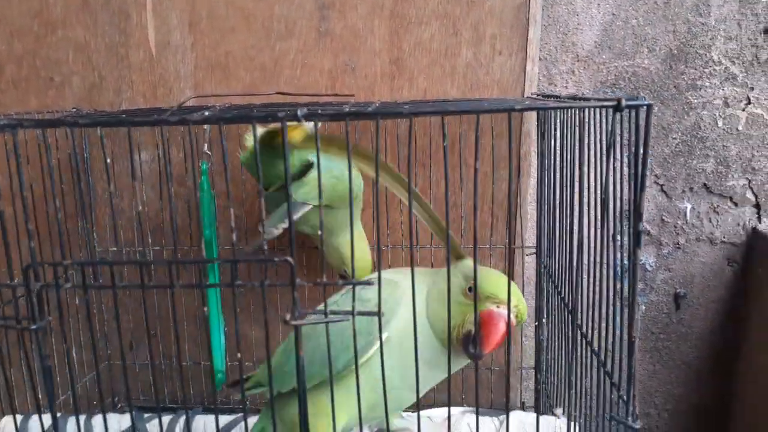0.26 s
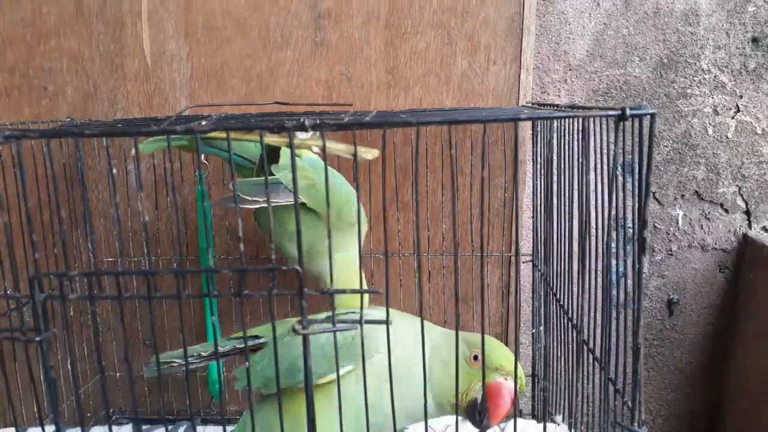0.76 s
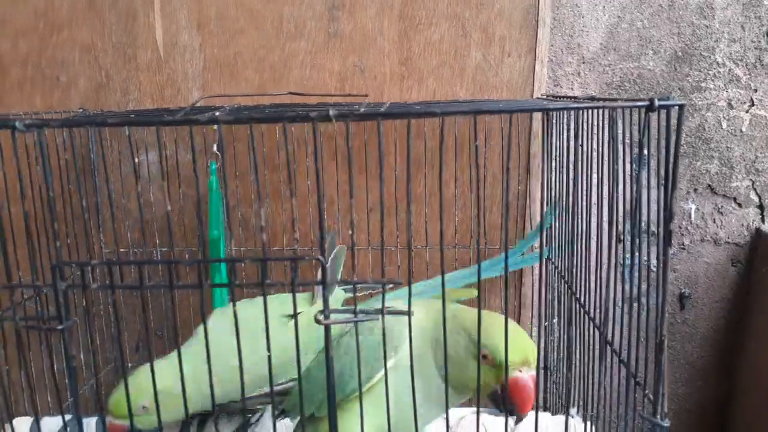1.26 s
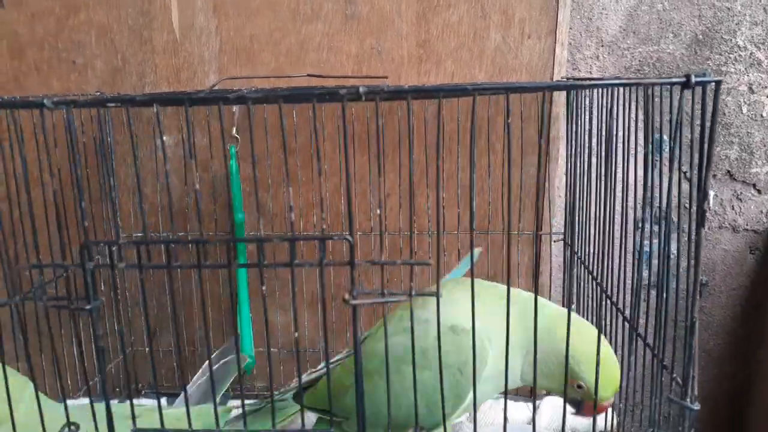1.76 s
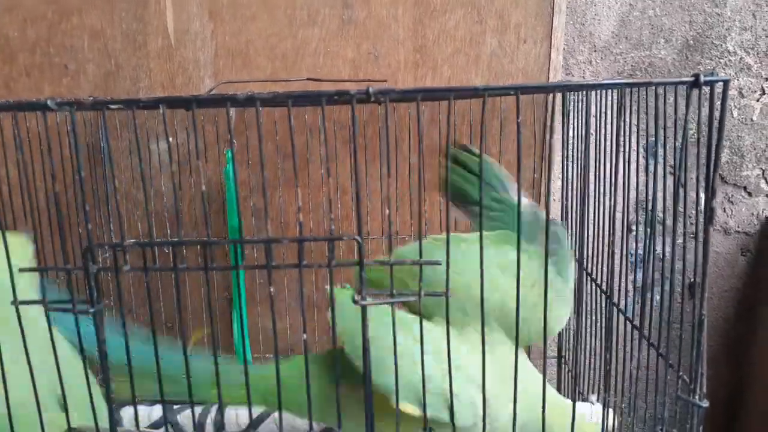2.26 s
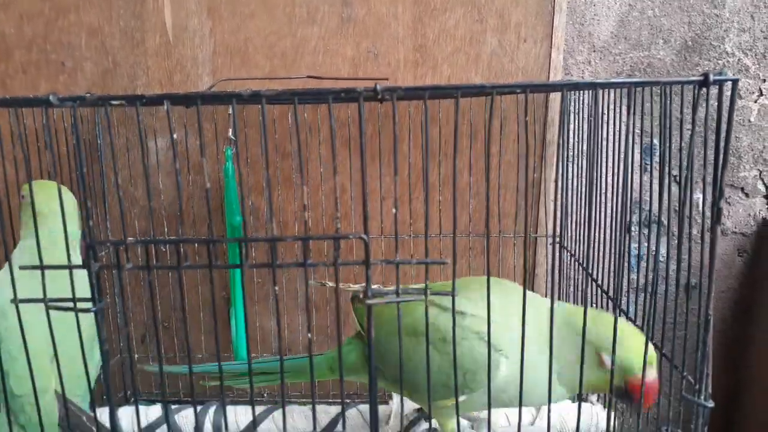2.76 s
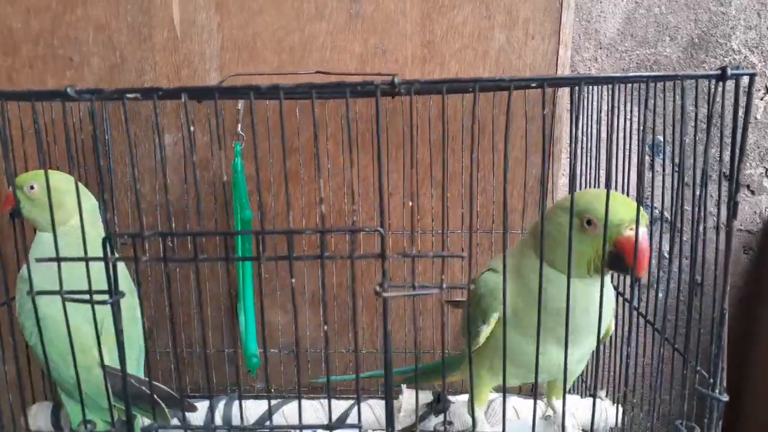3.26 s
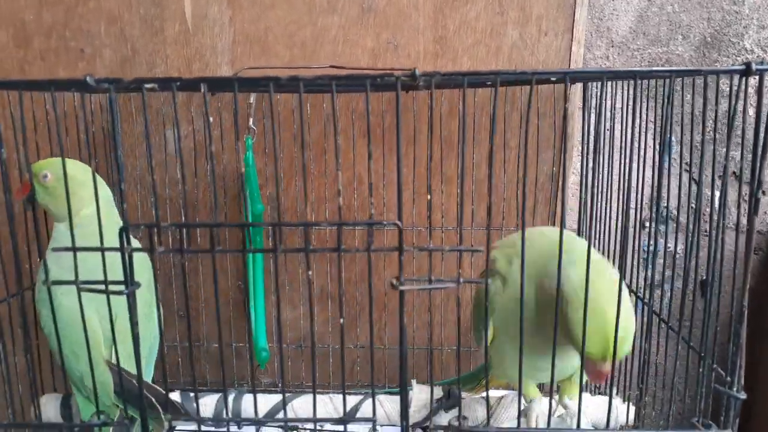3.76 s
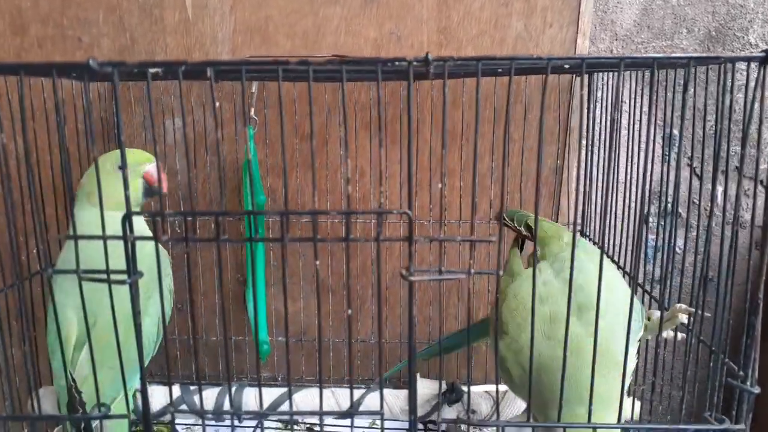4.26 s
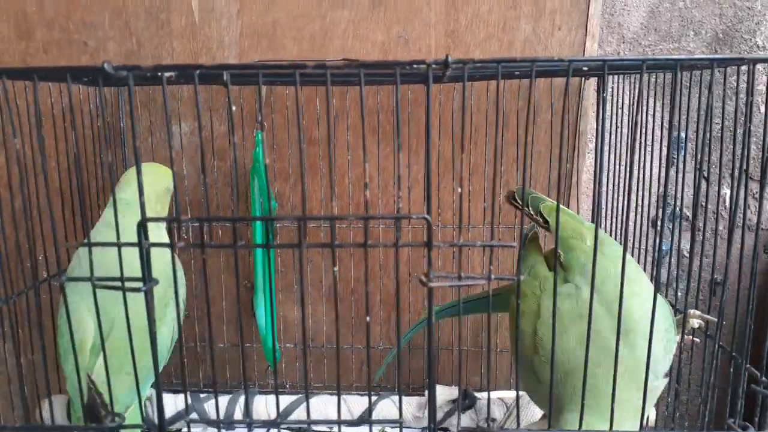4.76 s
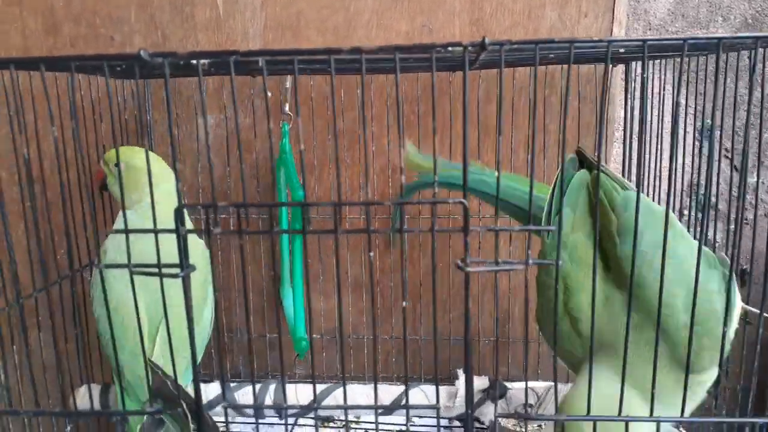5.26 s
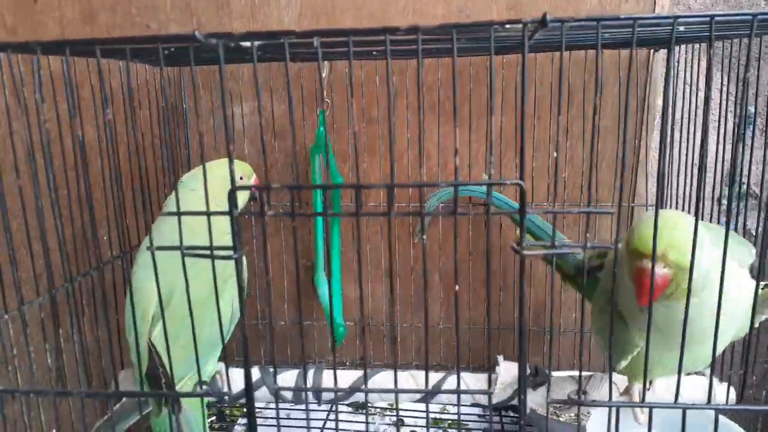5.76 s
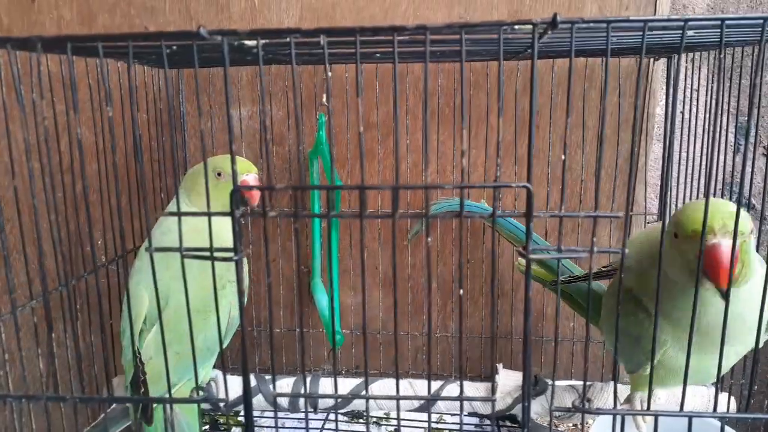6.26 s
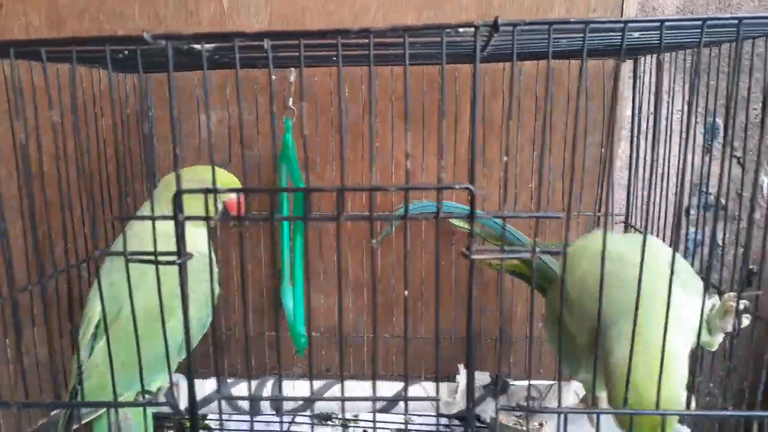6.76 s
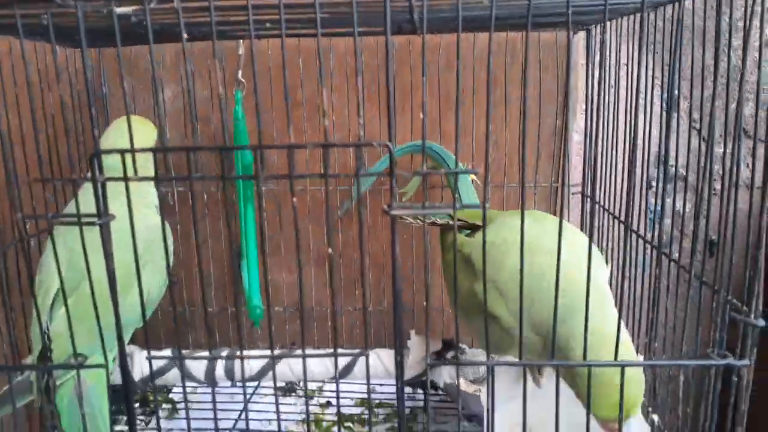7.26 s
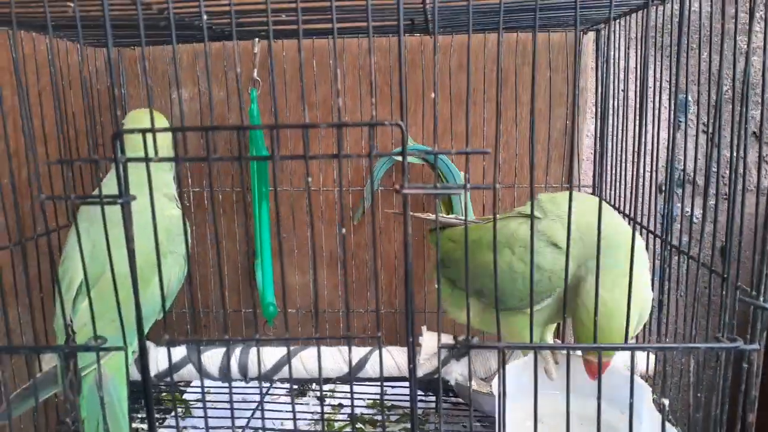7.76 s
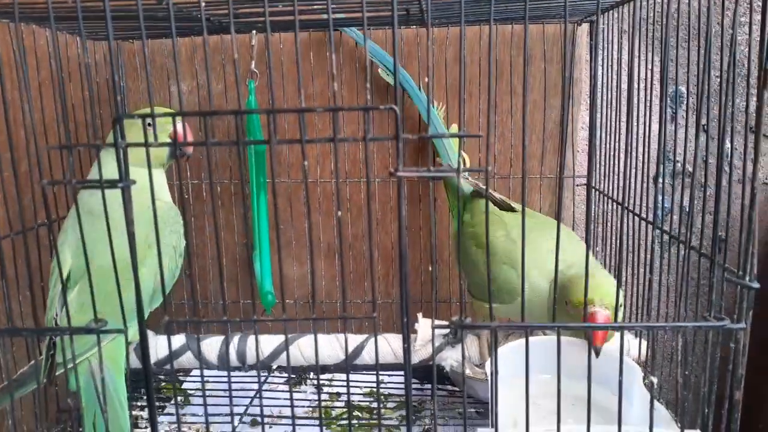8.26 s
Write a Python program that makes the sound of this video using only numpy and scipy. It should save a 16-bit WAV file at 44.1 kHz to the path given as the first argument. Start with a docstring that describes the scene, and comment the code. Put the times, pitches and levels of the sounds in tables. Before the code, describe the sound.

Sharp scratchy parrot squawks arch up and fall to a whistle, with beak and claw clicks, a small landing knock and soft feather rustles between.

```python
"""A wire cage against a wall, with two parakeets in it, close to a phone with two microphone ports.
A squawk sounds four times, the first already under way: stacked harmonics scratch upward, arch, then
fall to a whistle, shaped by the throat and by close echoes. Noise bursts make beak and claw ticks, knocks,
feather rustles and scuffs, with a short live room tail over outdoor rumble and hiss.
The phone's gain control turns everything down while it is loud, holds, then creeps back."""
import sys
import numpy as np
from scipy import signal
from scipy.fft import rfft, irfft, next_fast_len
from scipy.io import wavfile
from scipy.ndimage import uniform_filter1d, minimum_filter1d

SR = 44100
rng = np.random.default_rng(int(sys.argv[2]) if len(sys.argv) > 2 else 0)


def to_wav(sig):
    """Store sig (one row per channel, or 1-D mono) as 16-bit WAV at the path in sys.argv[1].

    Samples outside -1..1 are clipped; the rate is SR.
    """
    pcm = np.clip(np.atleast_2d(sig), -1, 1) * 32767
    pcm = np.round(pcm).astype(np.int16)
    wavfile.write(sys.argv[1], SR, pcm.T)  # frames by channels


N = 375291
TOP_HZ = 15900  # no voice harmonics above this; the phone also cuts here

# release of a voice: level slope, and a small lift in pitch
RELEASE_DB_PER_S, RELEASE_HZ_PER_S = -1100, 1500
SPLIT_FADE_DB_PER_S = -130

# the squawks, one row each: (start t/s,
#  pitch: (scratch t/s, climb t/s, slide t/s, crest f/Hz, low f/Hz the slide heads for,
#          climb bend, time to fall halfway t/s, fall steepness),
#  effort: (attack t/s, scratch level/dB, arch level/dB, whistle level/dB, added scratch roughness 0-1),
#  rattle: (time after the start t/s, half length t/s, added roughness 0-1))
SQUAWK_GESTURES = [ (-.12, (.035, .064, .134, 2150, 1335, 1, .042, 3), (0.012, 5.6, 5.7, 3.7, 0.36),
                   (0.15, 0.03, 0.2)), (4.681, (.034, .063, .16, 2172, 1392, 1.1, .069, 3.8),
                   (.004, 6.2, 13, 5.3, 0.41), (0.093, 0.021, 0.12)),
                   (5.258, (.038, .056, .148, 2142, 1413, 1.1, .0365, 2.9), (0.025, 12.2, 12.7, 4.6, 0.57),
                   (0.11, 0.041, .15)), (6.4385, (.023, .0635, .262, 2480, 1150, 4, .076, 1.62),
                   (0.011, 10, 12.3, 10, 0.5), (0.096, 0.025, 0.82))]
# where each squawk comes from: (right port lag t/ms, left minus right level/dB before the right direct loss,
#  brightness of the harmonics dB/octave)
CALLER_PLACES = [(0.299, 9.5, -2.5), (.387, 5, -3), (.387, 5, -3), (0.386, 4.5, -4)]
# a second tone as the voice splits: (squawk index, t/s, length t/s, pitch f/Hz, starting effort level/dB,
#  roughness 0-1)
SPLIT_VOICES = [(0, .016, .05, 3750, 9, .35), (3, 6.511, .05, 2765, 3, .15)]


def caller():
    """Four squawks; in the first and the last the voice briefly splits in two."""
    out = np.zeros((2, N))
    t = np.arange(SR // 2) / SR
    for (start, pitch, effort, rattle), (lag_ms, pan_db, slope_db) in zip(SQUAWK_GESTURES, CALLER_PLACES):
        hz, effort_db, rough = gesture(t, pitch, effort, rattle)
        voice = squawk(t, hz, effort_db, rough, slope_db)
        add(out, start, reflect(voice, lag_ms, pan_db))
    for which, start, length, hz, db, rough in SPLIT_VOICES:
        lag_ms, pan_db, slope_db = CALLER_PLACES[which]
        effort_db = db + SPLIT_FADE_DB_PER_S * t + RELEASE_DB_PER_S * np.maximum(t - length, 0)
        voice = squawk(t, hz, effort_db, rough, slope_db, count=3)
        add(out, start, reflect(voice, lag_ms, pan_db))
    return out


# the scratch accelerates from one pitch to the other
SCRATCH_HZ, VOICED_HZ, SCRATCH_BEND = 610, 1962, 1.7
CLEAN_ROUGH, CLEARS_S = .025, .003  # roughness 0-1; time constant of clearing after the scratch
ATTACK_DB = -13  # a squawk swells from this far below
RATTLE_COST_DB = -9  # effort lost at full rattle


def gesture(t, pitch, effort, rattle):
    """Pitch, effort and roughness through one squawk: scratch, climb, slide and release."""
    scratch, climb, slide, crest_hz, low_hz, bend, half_fall, steepness = pitch
    attack, scratch_db, arch_db, whistle_db, scratch_rough = effort
    rattle_at, rattle_s, rattle_rough = rattle
    crest = scratch + climb
    released = np.maximum(t - crest - slide, 0)

    scratched = np.minimum(t / scratch, 1) ** SCRATCH_BEND
    scratching = SCRATCH_HZ * (VOICED_HZ / SCRATCH_HZ) ** scratched
    climbed = np.clip((t - scratch) / climb, 0, 1) ** bend
    climbing = (crest_hz - VOICED_HZ) * np.sin(np.pi / 2 * climbed)
    fallen = 1 - 1 / (1 + (np.clip(t - crest, 0, slide) / half_fall) ** steepness)
    hz = scratching + climbing - (crest_hz - low_hz) * fallen + RELEASE_HZ_PER_S * released

    harsh = np.exp(-np.maximum(t - scratch, 0) / CLEARS_S)
    rattling = rattle_rough * np.exp(-((t - rattle_at) / rattle_s) ** 2)
    held_db = np.interp(t, [crest + half_fall, crest + slide], [arch_db, whistle_db])
    edges_db = ATTACK_DB * np.maximum(1 - t / attack, 0) + RELEASE_DB_PER_S * released
    effort_db = harsh * scratch_db + (1 - harsh) * held_db + edges_db + RATTLE_COST_DB * rattling
    rough = np.clip(CLEAN_ROUGH + scratch_rough * harsh + rattling, 0, 1)
    return hz, effort_db, rough


VOICE_DB = -18.5
ROUGH_TILT_DB = -1.5  # dB/octave added at full roughness: a rough voice is duller
# throat and beak resonance, on each harmonic and the rasp: (f/Hz, level/dB)
THROAT_RESONANCE = [(600, -13.5), (950, -27.5), (1350, -14.5), (2050, -12.5), (2450, -3.5), (2800, 7.5),
                    (3400, -4), (4300, -7), (5500, -7), (6500, -9.5), (7600, -12.5), (10000, -25),
                    (13000, -26), (16000, -32.5)]


def squawk(t, hz, effort_db, rough, slope_db, count=20, flutter_hz=300, flutter=0.11, shimmer=0.55,
           rasp_db=-17.5, rasp_hz=1900, edge_db=2.0):
    """The syrinx sings a stack of harmonics; when it rattles, pitch and strength flutter and air rasps."""
    waver = .004 * band(170, .9, len(t))
    hz = hz * (1 + flutter * rough * band(flutter_hz, 0.37, len(t)) + waver)
    phase = 2 * np.pi * np.cumsum(hz) / SR
    k = np.arange(1, count + 1)[:, None]
    octave = np.log2(k)
    # the high harmonics come and go, each on its own
    flicker_db = edge_db * octave * np.array([band(58, 0.38, len(t)) for _ in k])
    tilt_db = (slope_db + ROUGH_TILT_DB * rough) * octave
    weights = gain_at(k * hz, THROAT_RESONANCE) * undb(tilt_db + flicker_db) * (k * hz < TOP_HZ)
    voice = (weights * np.sin(k * phase)).sum(axis=0) * np.sqrt(2)
    voice *= (1 + shimmer * rough * band(210, 0.92, len(t))) / (1 + .5 * rough)
    # air escapes once a cycle, through the same throat
    rasp = noise(THROAT_RESONANCE, len(t)) * (1 + np.cos(phase)) * rough * undb(rasp_db)
    rasp = signal.sosfilt(signal.butter(6, rasp_hz, "high", fs=SR, output="sos"), rasp)
    gate = np.minimum(t / 0.0057, 1)
    return (voice + rasp) * gate * undb(effort_db + VOICE_DB)


RIGHT_DIRECT_DB = -5.5
# close wall, tray and phone body echoes, a list for the left port then the right: (delay t/ms, level/dB)
CLOSE_ECHOES = [
    [(0.11, -21.5), (0.367, -11.5), (0.622, -10.5), (1.221, -7.5), (2.335, -13.5)],
    [(0.437, 5), (1.403, -6), (1.508, -12.5), (2.488, -4.5), (2.774, -6)],
]


def reflect(x, lag_ms, pan_db):
    """A call reaches each port directly and by short echoes, which comb its sliding harmonics."""
    direct = np.array([x, undb(RIGHT_DIRECT_DB) * delay(x, lag_ms)])
    echoes = np.array([sum(undb(db) * delay(x, ms) for ms, db in paths) for paths in CLOSE_ECHOES])
    return (direct + echoes) * undb(np.array([[pan_db], [-pan_db]]) / 2)


REBOUND_S, REBOUND_DB, REBOUND_TILT_DB = .0085, -15, -9.5  # a softer, duller touch after each tick
RUSTLE_FADE_S, SCUFF_FADE_S = .32, .35  # time to fade 60 dB

# beak and claw ticks: (t/s, level/dB before the cage's tick trim, 60 dB ring t/s, treble tilt dB/octave)
CAGE_TICKS = [(0.196, -23.5, 0.0096, -5.5), (.2423, -27.5, 0.0044, -4.5), (0.3384, -23, 0.0083, -1.5),
              (0.7682, -41.5, 0.017, -17), (0.8477, -36, 0.014, -4.5), (.9068, -40.5, .022, -6),
              (.934, -42, .006, -2), (1.0845, -24, 0.0031, 1), (1.2256, -35, 0.008, 1.5),
              (1.254, -38, 0.0092, 6), (1.6565, -29.5, 0.0029, -0.5), (2.0012, -34.5, 0.019, 2),
              (2.087, -18.5, 0.0055, 2), (2.106, -37, 0.019, 7), (2.277, -43, .008, 0),
              (2.4429, -46, .005, 0.5), (2.6935, -25, 0.0072, 1.5), (3.0118, -40, 0.01, -1),
              (3.635, -29, .0045, -1.5), (3.6384, -27, 0.0039, -3.5), (3.651, -28, .0025, -2.5),
              (7.7238, -37.5, 0.0057, -2.5), (8.084, -26.5, .007, -4.5)]
# a bird landing on the tray: (t/s, level/dB, 60 dB ring t/s, centre f/Hz)
TRAY_KNOCKS = [(2.0617, -23.5, 0.0088, 1500), (2.062, -26, 0.0071, 3840), (2.0875, -19.5, 0.0083, 1380),
               (2.106, -34, 0.022, 3040), (2.107, -26, 0.042, 177)]
# feathers brushing the bars: (t/s, rise t/s, level/dB, centre f/Hz, bell spread in octaves)
FEATHER_RUSTLES = [(0.408, 0.00073, -37, 5850, 4.2), (1.088, 0.15, -45, 4700, 3),
                   (1.729, 0.0098, -43, 7550, .85), (2.077, 0.0027, -37.5, 6000, 4.8),
                   (2.25, 0.053, -54, 10000, 1), (2.441, .002, -46.5, 6000, 3.5),
                   (3.01, 0.0015, -41, 9000, 1), (3.545, 0.016, -44.5, 9800, 1.5),
                   (3.635, 0.0079, -44.5, 7600, 2.6), (3.76, 0.2, -54.5, 7000, 1.2)]
# faint ringing scuffs: (t/s, rise t/s, level/dB)
FAINT_SCUFFS = [(1.122, 0.054, -42), (2.203, .008, -44.5), (2.32, 0.0024, -47), (4.061, 0.0017, -42.5),
                (8.315, 0.0059, -47)]
# what a scuff rings with: (centre f/Hz, bell spread in octaves, level/dB)
SCUFF_RESONANCES = [(1346, 0.24, 2), (3430, 0.56, -3.5)]


def cage(tick_db=-1.5):
    """Sharp ticks of beak and claw, a few dull knocks, the swish of feathers on wire and faint scuffs."""
    out = np.zeros(N)
    for start, db, ring, tilt_db in CAGE_TICKS:
        add(out, start, tick(db + tick_db, ring, tilt_db))
        rebound = tick(db + tick_db + REBOUND_DB, ring, tilt_db + REBOUND_TILT_DB)
        add(out, start + REBOUND_S, rebound)
    t = np.arange(SR // 10) / SR
    for start, db, ring, hz in TRAY_KNOCKS:
        add(out, start, band(hz, .45, len(t)) * undb(db - 60 * t / ring))
    t = np.arange(SR) / SR
    for start, rise, db, hz, octaves in FEATHER_RUSTLES:
        barbs = undb(2.0 * band(120, 3.3, len(t)))  # barbs catch and slip unevenly
        swish = band(hz, octaves, len(t)) * barbs
        add(out, start, swish * swell(t, rise, RUSTLE_FADE_S) * undb(db))
    for start, rise, db in FAINT_SCUFFS:
        ring = sum(band(hz, octaves, len(t)) * undb(part_db) for hz, octaves, part_db in SCUFF_RESONANCES)
        add(out, start, ring * swell(t, rise, SCUFF_FADE_S) * undb(db))
    return ports(out, lag_ms=.31, pan_db=-3)


# what a tick rings with: (f/Hz, level/dB)
WIRE_COLOUR = [(300, -73), (2200, -17), (3200, 7.5), (4500, 10), (6500, 6), (8500, 8), (12000, 8.5),
               (16000, -5)]


def tick(db, ring, tilt_db, snap=4):
    """One touch of beak or claw on wire: a hard snap and decaying noise, coloured by the metal."""
    t = np.arange(SR // 10) / SR
    contact = rng.standard_normal(len(t)) * undb(-60 * t / ring)
    contact[0] = snap  # the hard first touch, then a brief chatter
    tilt = undb(tilt_db * np.log2((freqs(t) + 500) / 6000))
    colour = gain_at(freqs(t), WIRE_COLOUR) * tilt
    touch = irfft(rfft(contact) * colour, len(t))
    return delay(touch, .5)[:len(t) // 2] * undb(db)


def swell(t, rise, fade):
    """A straight rise, then a fade of 60 dB in the given time."""
    return np.minimum(t / rise, 1) * undb(-60 * np.maximum(t - rise, 0) / fade)


def ports(x, lag_ms, pan_db):
    """The two microphone ports: the right one hears the cage a little later."""
    return np.array([x * undb(pan_db / 2), delay(x, lag_ms) * undb(-pan_db / 2)])


def room(x, wet_db=-4.0, t60_low=0.24, t60_high=0.15, split_hz=6000, gap=0.00063):
    """A short diffuse tail, different at each port, whose treble dies first."""
    t = np.arange(SR // 2) / SR
    scatter = rng.standard_normal((2, len(t)))
    low = signal.sosfilt(signal.butter(2, split_hz, fs=SR, output="sos"), scatter)
    high = signal.sosfilt(signal.butter(2, split_hz, "high", fs=SR, output="sos"), scatter)
    tail = low * undb(-60 * t / t60_low) - 1.6 * high * undb(-60 * t / t60_high)
    tail *= np.clip(t / gap - 1, 0, 1)  # silent for one gap, full after two
    tail = unit(tail) / np.sqrt(len(t))
    return undb(wet_db) * signal.fftconvolve(x, tail, axes=1)[:, :N]


RUMBLE_DB, HISS_DB = -47, -52.5  # before the stereo spread adds to them
VARIATION_DB = .9  # small random level variation, rms
# spectrum of the distant outdoor rumble: (f/Hz, level/dB)
RUMBLE_SPECTRUM = [(15, -38.5), (25, -26), (69, 0.5), (113, -3), (151, 3.5), (205, -6.5), (313, -1),
                   (356, -4), (386, 0.5), (517, -8.5), (750, -9.5), (1000, -12), (1200, -42.5), (1560, -61),
                   (2640, -120)]
# spectrum of the hiss: (f/Hz, level/dB)
HISS_SPECTRUM = [(600, -1.5), (1100, 4), (1800, -1.5), (3200, -3), (5000, -11), (7200, -18), (9200, -14.5),
                 (12000, -18.5), (13500, -24), (15500, -22.5)]


def background(rumble_side=.2, hiss_side=1.0):
    """Two steady layers of noise: distant rumble, nearly the same at both ports, and a wider hiss."""
    sides = np.array([[1], [-1]])
    rumble = noise(RUMBLE_SPECTRUM) * undb(sides * -.7) + rumble_side * sides * noise(RUMBLE_SPECTRUM)
    hiss = noise(HISS_SPECTRUM) + hiss_side * sides * noise(HISS_SPECTRUM)
    variation = undb(VARIATION_DB * band(4, 1.0, next_fast_len(N))[:N])
    return variation * (rumble * undb(RUMBLE_DB) + hiss * undb(HISS_DB))


def scene(cage_room_db=-3):
    """Birds and cage in their room, over the background; the small sounds stay drier than the calls."""
    calls, small = caller(), cage()
    return calls + small + room(calls + undb(cage_room_db) * small) + background()


THRESHOLD_DB = -20
DUCK_RANGE_DB, DUCK_DB_PER_S, DUCK_HOLD_S, RECOVER_DB_PER_S = 8.5, 44, 0.79, 6


def gain_control(x, size=441):
    """Turns down at a steady rate while the sound is loud, holds, then recovers slowly."""
    power = uniform_filter1d(np.mean(x ** 2, axis=0), 4 * size)[::size].clip(0)
    loud = np.sqrt(power) > undb(THRESHOLD_DB)
    step, cut_db, quiet_s, cuts = size / SR, 0, 0, []
    for over in loud:
        quiet_s = 0 if over else quiet_s + step
        if over:
            change = DUCK_DB_PER_S * step
        else:
            change = -RECOVER_DB_PER_S * min(max(quiet_s - DUCK_HOLD_S, 0), step)
        cut_db = min(max(cut_db + change, 0), DUCK_RANGE_DB)
        cuts.append(cut_db)
    return x * undb(-np.interp(np.arange(N) / size, np.arange(len(cuts)), cuts))


def record(dry, ceiling_db=-1.5, size=400):
    """The phone's gain control rides the level, its limiter eases the loudest peaks down; then the top is cut."""
    ridden = gain_control(dry)
    needed = np.minimum(1, undb(ceiling_db) / (np.abs(ridden).max(axis=0) + 1e-9))
    gain = uniform_filter1d(minimum_filter1d(needed, size), size)
    return signal.sosfilt(signal.ellip(10, .2, 70, TOP_HZ, fs=SR, output="sos"), ridden * gain)


def undb(db):
    """Decibels to gain."""
    return 10 ** (np.asarray(db) / 20)


def unit(x):
    """Scale to rms 1."""
    return x / np.sqrt(np.mean(x ** 2))


def gain_at(hz, points):
    """Gain of a (f/Hz, level/dB) spectrum on a log-frequency axis."""
    f, db = np.transpose(points)
    return undb(np.interp(np.log(hz + 1), np.log(f), db))


def freqs(x):
    """Frequencies of the bins of x."""
    return np.arange(x.shape[-1] // 2 + 1) * SR / x.shape[-1]


def noise(points, size=N):
    """Noise of rms 1 with a (f/Hz, level/dB) spectrum."""
    x = rng.standard_normal(next_fast_len(size))
    return unit(irfft(rfft(x) * gain_at(freqs(x), points), len(x))[:size])


def band(hz, octaves, size):
    """Noise of rms 1 in one bell-shaped band."""
    x = rng.standard_normal(size)
    bell = np.exp(-.5 * (np.log2((freqs(x) + 1) / hz) / octaves) ** 2)
    return unit(irfft(rfft(x) * bell, size))


def delay(x, ms):
    """Delay by a fraction of a sample or more."""
    return irfft(rfft(x) * np.exp(-2j * np.pi * freqs(x) * ms / 10 ** 3), len(x))


def add(out, start, x):
    """Mix x into out from a time in seconds; what comes before time 0 is dropped."""
    i = int(start * SR)
    x, i = x[..., max(-i, 0):], max(i, 0)
    out[..., i:i + x.shape[-1]] += x[..., :N - i]


dry = scene()
out = record(dry)
to_wav(out)
```